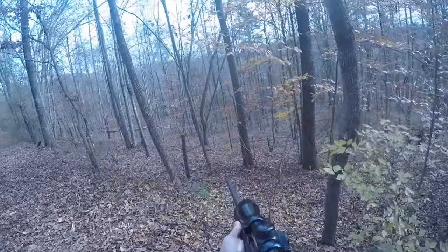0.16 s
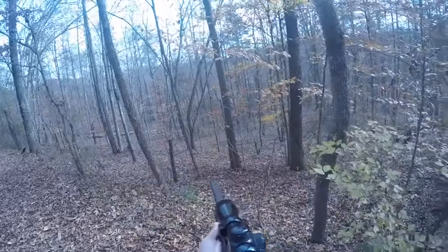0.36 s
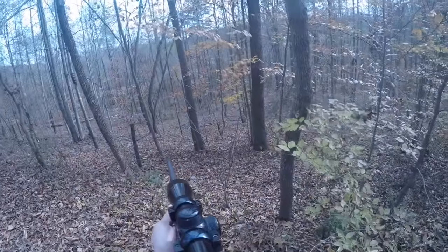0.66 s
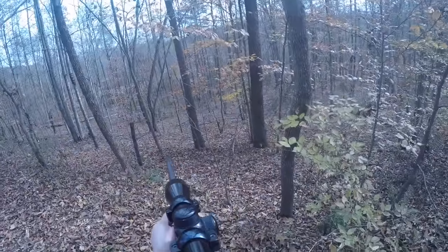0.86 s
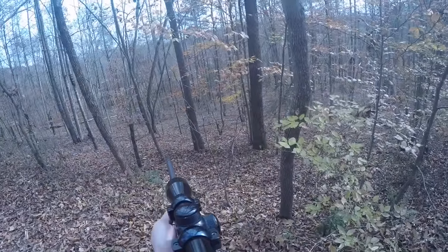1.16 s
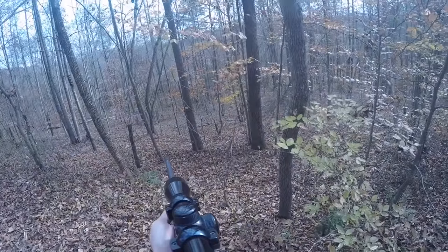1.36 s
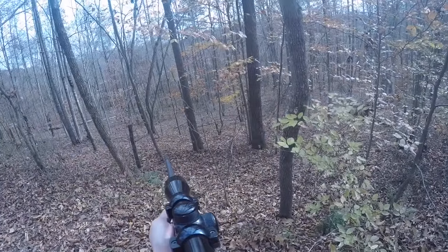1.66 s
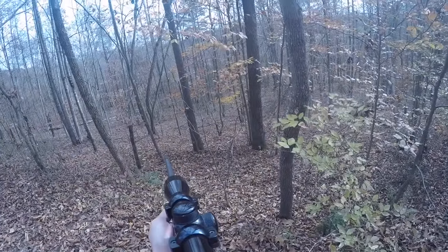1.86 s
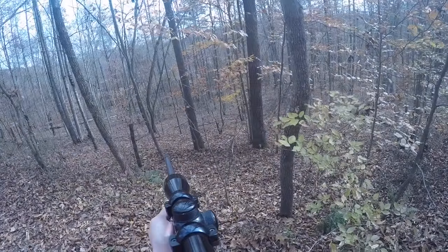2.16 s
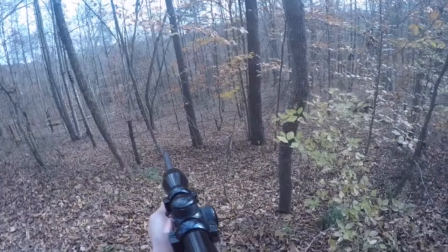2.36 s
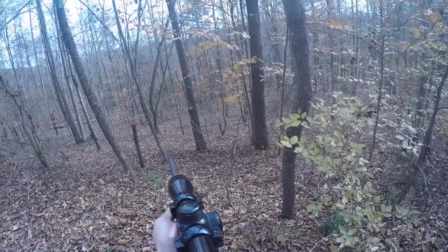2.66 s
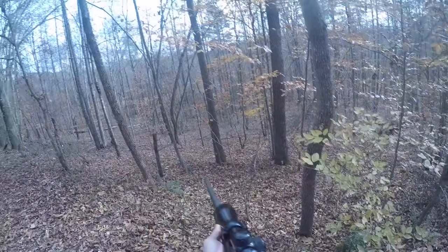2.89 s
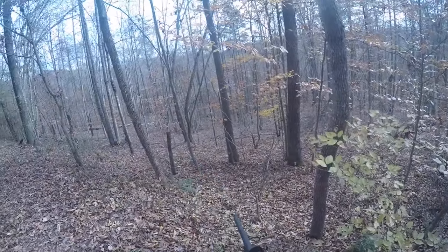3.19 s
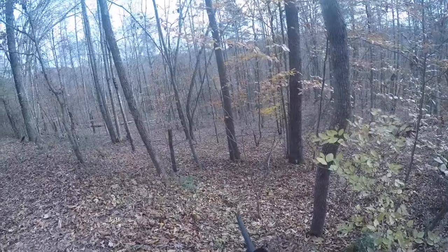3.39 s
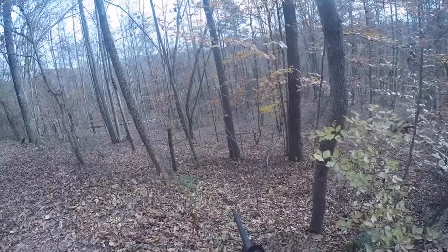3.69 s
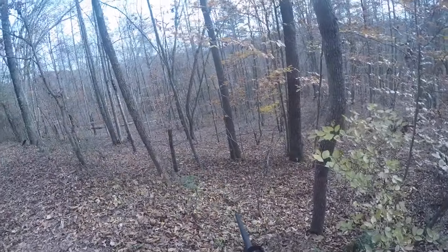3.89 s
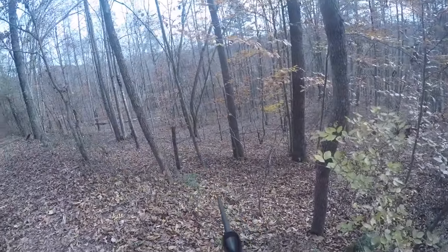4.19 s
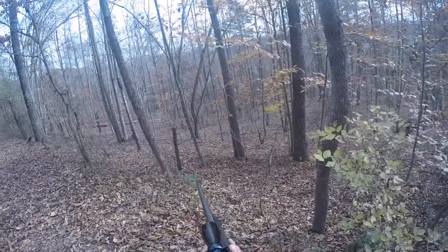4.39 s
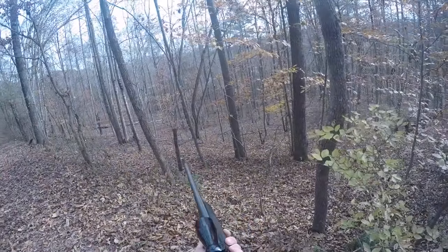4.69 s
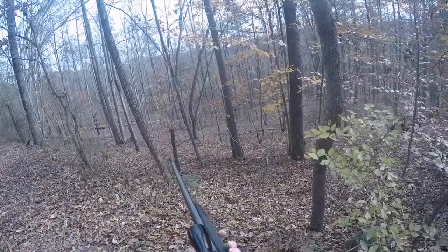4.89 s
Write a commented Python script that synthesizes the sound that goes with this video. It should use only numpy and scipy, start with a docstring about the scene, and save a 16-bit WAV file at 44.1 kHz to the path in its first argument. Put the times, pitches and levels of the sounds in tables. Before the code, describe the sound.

In quiet woods a safety catch clicks, then one rifle shot cracks hard, its echo rolling away before the bolt is worked with metallic clacks.

```python
"""Small clicks of a safety catch in quiet woods, one rifle shot with a long echo, then the bolt being worked.
The shot is shaped noise plus N-shaped pressure waves; the echo is separate slaps over a decaying noise roll.
Safety and bolt are brief forces driving metal resonances and a dull stock filter.
Sleeve rub, stirring air and a steady hush are filtered noise under slow envelopes or at constant level.
Gain control ducks at the shot and creeps back under the echo; overload clips the peaks."""
import sys
import numpy as np
from scipy import signal
from scipy.fft import rfft, irfft
from scipy.io import wavfile

SR = 44100
rng = np.random.default_rng(int(sys.argv[2]) if len(sys.argv) > 2 else 0)


def put_to_file(sound):
    """Save the sound as 16-bit audio at rate SR, in the file named by the first command-line argument."""
    columns = np.atleast_2d(sound).T  # one column per channel
    safe = np.clip(columns, -1, 1)
    whole_steps = np.round(safe * 32767)
    wavfile.write(sys.argv[1], SR, whole_steps.astype(np.int16))


N = 222616
TIME = np.arange(N) / SR   # s
SHOT_S = 2.3705   # origin of the echo's travel time


def from_db(db):
    """Logarithmic level: decibels become an amplitude ratio."""
    return 10 ** (np.asarray(db) / 20)


def rms_one(x):
    """Normalization: scale a signal to unit rms."""
    return x / np.sqrt(np.mean(x ** 2) + 1e-20)


def at_hz(points, hz):
    """Logarithmic frequency scale: interpolate a table linearly in log frequency."""
    table_hz, value = np.transpose(points)
    return np.interp(np.log(np.maximum(hz, 1)), np.log(table_hz), value)


def butter(x, hz, kind, order=2):
    """Causal filtering: a Butterworth low- or high-pass."""
    sos = signal.butter(order, np.minimum(hz, .45 * SR), kind, fs=SR, output="sos")
    return signal.sosfilt(sos, x + 1e-18)


def coloured(x, colour):
    """Minimum phase: a causal filter of given spectrum, found by folding the cepstrum; unit gain for white noise."""
    size = 8192
    spectrum = from_db(at_hz(colour, np.arange(size // 2 + 1) * SR / size))
    cepstrum = irfft(np.log(spectrum))
    cepstrum[1:size // 2] *= 2
    cepstrum[size // 2 + 1:] = 0
    response = irfft(np.exp(rfft(cepstrum)))
    return signal.oaconvolve(x, response / np.linalg.norm(response))[:N]


def noise(colour):
    """Spectral shaping: white noise filtered to a given spectrum, at unit rms."""
    return rms_one(coloured(rng.standard_normal(N), colour))


def wander(hz):
    """Random modulation: low-passed noise of unit rms."""
    return rms_one(butter(rng.standard_normal(N), hz, "low"))


def swell(centre, width):
    """Gaussian envelope: a smooth rise and fall of height 1."""
    return np.exp(-((TIME - centre) / width) ** 2)


def burst(start, db, fade):
    """Exponential decay: an envelope that jumps up and falls by a factor e in each fade time."""
    age = TIME - start
    live = (age >= 0) & (age < 20 * fade)
    out = np.zeros(N)
    out[live] = from_db(db) * np.exp(-age[live] / fade)
    return out


def impact(start, db, fade, spike_db):
    """Impulsive excitation: one sharp spike followed by dying chatter of random sign."""
    force = burst(start, db, fade) * rng.choice([-1, 1], N)
    force[int(start * SR) + 1] = from_db(db + spike_db)
    return force


def ring(x, modes):
    """Modal superposition: parallel damped resonances of alternating sign, with unit gain for white noise."""
    age = TIME[:SR // 20]
    response = np.zeros(len(age))
    for k, (hz, width, db) in enumerate(modes):
        decay = np.exp(-np.pi * width * age)   # a wider resonance dies sooner
        # the factor width keeps the height of each resonance independent of its width
        response += (-1) ** k * from_db(db) * width * decay * np.cos(2 * np.pi * hz * age)
    return signal.oaconvolve(x, response / np.linalg.norm(response))[:N]


# Dead knock of the stock under each contact. Each row: frequency in Hz, relative spectrum level in dB.
STOCK_SPECTRUM = [(40, -7), (100, 1.5), (150, -9), (280, -6), (430, -1.5), (560, -8.5), (1000, 3.5),
                  (1300, -3.5), (2000, 3), (3000, 2.5), (3550, -2.5), (4500, 6.5), (6500, -15), (9000, -12),
                  (15000, -5.5)]


def contacts(table, modes, knock_db, spike_db):
    """Forced vibration: steel parts strike and chatter for milliseconds, ringing metal and knocking the stock."""
    metal, stock = np.zeros(N), np.zeros(N)
    for start, db, fade, dull_hz, ring_db in table:
        force = butter(impact(start, db, fade, spike_db), dull_hz, "low")
        metal += from_db(ring_db) * force
        stock += from_db(knock_db) * force
    return ring(metal, modes) + coloured(stock, STOCK_SPECTRUM)


def undergrowth(x, wet_db, t60, thin_hz=5000):
    """Diffuse scattering: close leaves and stems return mostly treble, a faint tail falling 60 dB in t60 seconds."""
    age = TIME[:SR // 2]
    white = rng.standard_normal(len(age))
    mostly_treble = 0.3 * white + butter(white, thin_hz, "high", order=1)
    response = mostly_treble * from_db(-60 * age / t60)
    return x + from_db(wet_db) * signal.oaconvolve(x, response / np.linalg.norm(response))[:N]


# Steady background. Each row: frequency in Hz, relative spectrum level in dB.
HUSH_SPECTRUM = [(59, -33), (100, -2.5), (308, -5), (350, -4), (433, -9), (471, -6.5), (648, -14.5),
                 (705, -14), (1360, -19), (3050, -14), (3400, -16.5), (14100, -31.5), (15000, -29),
                 (16000, -50)]
HUSH_DB = -60   # rms level


def hush():
    """Stationary noise: the quiet background keeps one level and one spectrum."""
    return from_db(HUSH_DB) * noise(HUSH_SPECTRUM)


# The hunter shifts the rifle. Each row: centre in seconds, half-length in seconds (to 1/e),
# sleeve level in dB, air buffet level in dB.
MOVES = [(.1, 0.17, -62.5, -69), (.57, 0.12, -58, -62), (.9, .15, -68.5, -59.5), (3.73, 0.15, -67, -49),
         (4.19, 0.09, -57.5, -53), (4.42, .17, -64.5, -57.5), (4.9, 0.22, -70.5, -44),
         (5.05, .07, -65.5, -71)]
# Rubbing sleeves. Each row: frequency in Hz, relative spectrum level in dB.
SLEEVE_SPECTRUM = [(180, -43), (300, -9), (360, -2), (494, -5.5), (1900, -8.5), (2210, -7), (5250, -8.5),
                   (14700, -31.5), (16000, -31.5)]
# Air buffeting the microphone. Each row: frequency in Hz, relative spectrum level in dB.
BUFFET_SPECTRUM = [(10, -2.5), (22, 1), (40, -3), (70, -13), (130, -29), (300, -43.5), (1000, -75)]
BUFFET_DB, BUFFET_WANDER_DB, BUFFET_WANDER_HZ = -56, 3.5, 4   # stirring air while standing still
JOLT_DB, JOLT_FADE_S = -33.5, .04   # each bolt stop shakes the microphone; dB relative to the blow


def handling(rough_db=3.3, rough_hz=120):
    """Amplitude modulation: moves raise sleeve friction and air noise; the bolt's stops jolt the microphone."""
    rub = sum(from_db(db) * swell(s, width) for s, width, db, _ in MOVES)
    stir = sum(from_db(db) * swell(s, width) for s, width, _, db in MOVES)
    jolts = sum(burst(s, db + JOLT_DB, JOLT_FADE_S) for s, db, *_ in BOLT_STOPS)
    air = from_db(BUFFET_DB + BUFFET_WANDER_DB * wander(BUFFET_WANDER_HZ))
    roughness = from_db(rough_db * wander(rough_hz))
    sleeves = rub * roughness * noise(SLEEVE_SPECTRUM)
    return sleeves + (air + stir + jolts) * noise(BUFFET_SPECTRUM)


# Safety catch and small ticks of the grip. Each row: start in seconds, force level in dB,
# fade in seconds, low-pass edge in Hz, metal ring in dB relative to the force.
SAFETY_CONTACTS = [(.182, -39.5, 0.00089, 15000, -6), (.3182, -36, 0.0028, 7000, -3),
                   (.3497, -12, 0.00109, 15400, 2.5), (.359, -34.5, 0.0022, 12000, -1.5),
                   (.5985, -41, 0.0027, 9000, -13.5)]
# Resonances of the catch. Each row: frequency in Hz, width in Hz, relative level in dB.
SAFETY_MODES = [(1010, 76, -23), (1604, 160, -23), (2844, 174, -13), (4450, 167, -4.5), (5680, 600, -6.5),
                (7400, 550, -12), (8070, 350, -17), (9200, 242, -24), (10200, 500, -17.5),
                (11500, 580, -18), (13140, 230, -18.5), (15000, 420, -13)]


def safety():
    """Struck resonators: light contacts ring the catch, and the undergrowth scatters the clicks."""
    clicks = contacts(SAFETY_CONTACTS, SAFETY_MODES, knock_db=-26.0, spike_db=13.5)
    return undergrowth(clicks, wet_db=-28.0, t60=0.22)


# Gas noise leading the shot, then the muzzle blast. Each row: start in seconds, level in dB, fade in seconds.
BLAST = [(2.3641, -28, .008), (2.3664, -15, .006), (2.3679, -7, .001), (2.3705, 17, .0014),
         (2.3718, 16, .0006)]
# Blast colour. Each row: frequency in Hz, relative spectrum level in dB.
BLAST_SPECTRUM = [(100, -18), (400, 2), (1200, -11), (2500, -1.5), (6000, 4.5), (8500, -11), (15000, -6.5)]
# Pressure wave, a rebound of the microphone, and low reflections. Each row: start in seconds, height in dB
# before filtering, length in seconds.
PRESSURE_WAVES = [(2.3731, 18, .0064), (2.3774, 12, .0018), (2.3800, 0, .004), (2.3893, -1, .004),
                  (2.4098, -5, .004), (2.4725, -11, .0035)]


def muzzle(edge_hz=1100, skew=0.63):
    """Blast-wave radiation: a tearing crack with lopsided N-waves, a short swing one way and a longer one back."""
    crack = noise(BLAST_SPECTRUM) * sum(burst(*row) for row in BLAST)
    waves = np.zeros(N)
    for start, db, length in PRESSURE_WAVES:
        phase = (TIME - start) / length
        live = (phase > 0) & (phase < 1)
        waves[live] += from_db(db) * (2 * phase[live] ** skew - 1)
    rounded = butter(waves, edge_hz, "low")
    return crack + butter(rounded, 25, "high", order=1)


# Loss in air, leaves and soft ground. Each row: frequency in Hz, loss in dB per second of travel.
ABSORPTION = [(50, 34.5), (150, 27), (300, 3), (600, 3.5), (1200, 4), (2000, 8.5), (2900, 13.5),
              (3700, 30.5), (5500, 39.5), (7500, 50.5), (10000, 76.5), (15000, 132)]


def travelled(x):
    """Absorption along the path: later echoes have come farther and lost more to air, leaves and ground."""
    hz, when, frames = signal.stft(x, SR, nperseg=1024)
    loss_db = abs(at_hz(ABSORPTION, hz))[:, None] * np.maximum(when - SHOT_S, 0)
    return signal.istft(frames * from_db(-loss_db), SR)[1][:N]


# The ground underfoot and a far bank answer once. Each row: start in seconds,
# level in dB before filtering, fade in seconds, low-pass edge in Hz.
BANKS = [(2.3776, 17, .0007, 14000), (2.9726, -17, .009, 2600)]
# The clearest trunks. Each row: start in seconds, level in dB relative to what the distance gives.
TRUNKS = [(2.3901, -1), (2.4051, 5.5), (2.4317, 1.5), (2.4403, 6.5), (2.455, -8), (2.4748, 4), (2.4992, 2)]
TRUNK_DB, TRUNK_FADE_S = 10.5, .0022   # a slap from close by, before filtering
DIRECT_LEAD_S, DIRECT_DB = .0033, -3.0   # each trunk answers twice: first directly, then a little louder via the ground
# Wooded slopes send the echo back in swells. Each row: centre in seconds, rise in dB.
SLOPES = [(2.74, 2.5), (3.14, 2), (3.26, 2), (3.58, 4)]
SWELL_S = 0.061   # half-length, to 1/e of the rise
# Colour of the reflected sound. Each row: frequency in Hz, relative spectrum level in dB.
ECHO_SPECTRUM = [(40, -7.5), (100, -8.5), (190, -11), (350, -1), (700, -6), (1300, -4), (2300, 1),
                 (3200, 0.5), (4300, -1), (6000, -2), (7500, -14), (15000, -11)]


def woods(start_db=0.0, near_s=0.043, spreading_db=25.5, build_s=.009,
          grain_db=1.0, grain_hz=190.0, bark_hz=9000, spike_db=5.5):
    """Multiple reflection: single trunks slap back; farther ones merge into a roll that thins with the path."""
    age = np.maximum(TIME - SHOT_S, 0)
    path_db = -spreading_db * np.log10(1 + age / near_s)
    swells = sum(db * swell(s, SWELL_S) for s, db in SLOPES)
    grain = grain_db * wander(grain_hz)   # reflections arrive in clumps
    building = 1 - np.exp(-(age / build_s) ** 4)   # the nearest trees are a few steps away
    arriving = building * from_db(start_db + path_db + swells + grain)

    slaps = sum(butter(impact(s, db, fade, spike_db), hz, "low") for s, db, fade, hz in BANKS)
    for s, extra_db in TRUNKS:
        db = TRUNK_DB + np.interp(s, TIME, path_db) + extra_db
        slaps = slaps + impact(s, db, TRUNK_FADE_S, spike_db)
        slaps = slaps + impact(s - DIRECT_LEAD_S, db + DIRECT_DB, TRUNK_FADE_S, spike_db)
    slaps = butter(slaps, 900, "high", order=1)   # thin trunks let the bass pass
    slaps = butter(slaps, bark_hz, "low", order=1)   # bark absorbs the top

    roll = arriving * rng.standard_normal(N)
    return travelled(coloured(roll + slaps, ECHO_SPECTRUM))


# Light clicks of the handle, the cartridge and the grip. Each row: start in seconds, force level in dB,
# fade in seconds, low-pass edge in Hz, metal ring in dB relative to the force.
BOLT_CLICKS = [(3.7025, -30.5, 0.0025, 7960, -7), (3.8347, -38, .004, 7130, -4),
               (4.0023, -40, 0.0014, 5440, -10), (3.8551, -29, 0.0028, 7100, 2),
               (4.0530, -41.5, 0.0053, 12130, -8), (4.0757, -22, 0.00085, 7540, -1.5),
               (4.2210, -35.5, 0.0021, 8200, 11), (4.2755, -29.5, .0031, 4950, 3.5),
               (4.5471, -44, 0.0032, 6000, -2), (4.9085, -32, 0.0025, 13000, -4)]
# Resonances of the steel action. Each row: frequency in Hz, width in Hz, relative level in dB.
ACTION_MODES = [(417, 120, -13), (1000, 160, -25), (1590, 66, -18), (2097, 170, -17.5), (3000, 99, -7.5),
                (5340, 240, 7), (6400, 480, 4), (7400, 170, -2), (8070, 350, -7), (9250, 160, -27.5),
                (10000, 580, -10.5), (10350, 170, -16.5), (11160, 450, -13.5), (12400, 230, -5.5),
                (13600, 330, -15), (14700, 540, -22)]


def bolt():
    """Shared resonator: stops, slides and clicks all excite the same steel action, scattered by undergrowth."""
    action = bolt_stops() + bolt_slides() + list(BOLT_CLICKS)
    struck = contacts(action, ACTION_MODES, knock_db=0.5, spike_db=9.5)
    return undergrowth(struck, wet_db=-22.0, t60=0.13)


# The bolt slides back, strips a cartridge and feeds it; the hand slips back to the grip.
# Each row: start in seconds, length in seconds, mean force level in dB.
SLIDES = [(3.848, .019, -51), (4.0674, .018, -28), (4.0932, .014, -23), (4.9108, .018, -46.5)]
CATCH_SPREAD_DB, SLIDE_RISE_DB = 3, 6.5   # unevenly, and harder as it gathers speed
CATCH_FADE_S, CATCH_HZ, CATCH_RING_DB = .002, 7600, 3   # each catch along the way


def bolt_slides(count=4, jitter=0.11):
    """Intermittent friction: each slide is a run of uneven catches that tend to grow stronger."""
    rows = []
    for s, length, db in SLIDES:
        for k, (early, strength) in enumerate(rng.standard_normal((count, 2))):
            way = (k + jitter * early * (k > 0)) / count   # fraction of the slide; the first catch is on time
            catch_db = db + SLIDE_RISE_DB * (way - .5) + CATCH_SPREAD_DB * strength
            rows.append((s + way * length, catch_db, CATCH_FADE_S, CATCH_HZ, CATCH_RING_DB))
    return rows


# The bolt hits its rear stop, then slams home. Each row: start in seconds, force level in dB,
# fade in seconds, low-pass edge in Hz, metal ring in dB relative to the force, thump in dB relative to the blow.
BOLT_STOPS = [(3.8576, -8.5, 0.0017, 9500, 0.5, -3.5), (4.1105, -7.5, 0.0015, 14050, 7.5, -20.5)]
REBOUND_LAG_S, REBOUND_DB, REBOUND_HZ, REBOUND_RING_DB = 0.0014, -3, 5000, 6   # the bolt bounces once
# the whole rifle takes the blow
THUMP_LAG_S, THUMP_FADE_S, THUMP_HZ, THUMP_RING_DB = 0.0013, 0.0027, 700, 10
# and loose parts settle
RATTLE_LAG_S, RATTLE_DB, RATTLE_FADE_S, RATTLE_HZ, RATTLE_RING_DB = .008, -19, 0.007, 7000, -11.5


def bolt_stops():
    """Collision and rebound: each hard stop is a blow, a bounce, a dull thump and a short rattle."""
    rows = []
    for s, db, fade, dull_hz, ring_db, thump_db in BOLT_STOPS:
        rows += [(s, db, fade, dull_hz, ring_db),
                 (s + REBOUND_LAG_S, db + REBOUND_DB, fade, REBOUND_HZ, REBOUND_RING_DB),
                 (s + THUMP_LAG_S, db + thump_db, THUMP_FADE_S, THUMP_HZ, THUMP_RING_DB),
                 (s + RATTLE_LAG_S, db + RATTLE_DB, RATTLE_FADE_S, RATTLE_HZ, RATTLE_RING_DB)]
    return rows


SWAY_HZ, SWAY_DB, SWAY_FADE_S = 85, -33.5, 0.0187   # the rear stop rocks the stock


def sway():
    """Damped free vibration: the stock's lowest mode, set off when the bolt hits its rear stop."""
    s = BOLT_STOPS[0][0]
    return burst(s, SWAY_DB, SWAY_FADE_S) * np.sin(2 * np.pi * SWAY_HZ * (TIME - s))


def scene():
    """Linear superposition: the rifle's clicks, the shot and the quiet add at the microphone."""
    clicks = safety() + bolt()
    shot = muzzle() + woods()
    mix = shot + clicks + sway() + handling() + hush()
    return mix[None]   # one channel


def gain_control(x, threshold_db=-2.0, depth_db=18.0, release_db_per_s=12.5):
    """Dynamic compression: loud sound pulls the gain down within milliseconds; it returns slowly."""
    power = butter(x ** 2, 16, "low", order=1)
    cut_db = np.clip(10 * np.log10(abs(power) + 1e-12) - threshold_db, 0, depth_db)
    # the deepest cut so far, relaxing at a constant rate
    released_db = release_db_per_s * TIME
    held_db = np.maximum.accumulate(cut_db + released_db, axis=-1) - released_db
    return x * from_db(-held_db)


CUTOFF_HZ = 15500   # upper edge of the recorded band


def record(dry):
    """Saturation and band limiting: gain control, then hard overload, then a steep top cut."""
    clipped = np.clip(gain_control(dry), -.92, .92)
    top_cut = signal.ellip(10, .1, 80, CUTOFF_HZ, fs=SR, output="sos")
    return signal.sosfilt(top_cut, clipped)


dry = scene()
out = record(dry)
put_to_file(out)
```